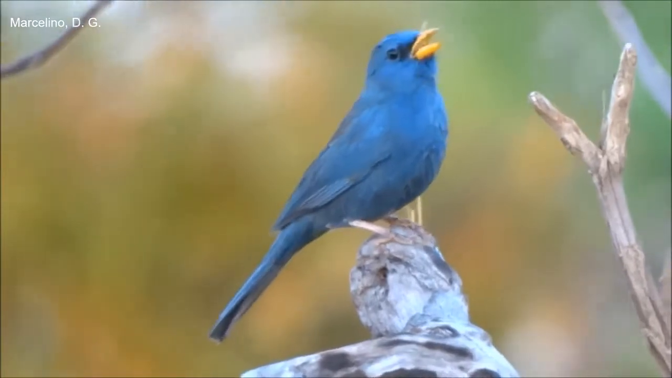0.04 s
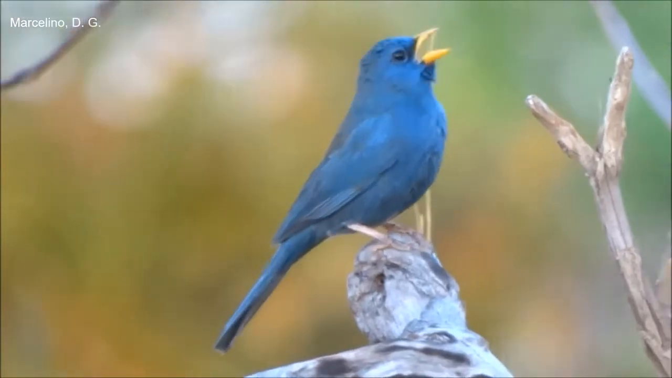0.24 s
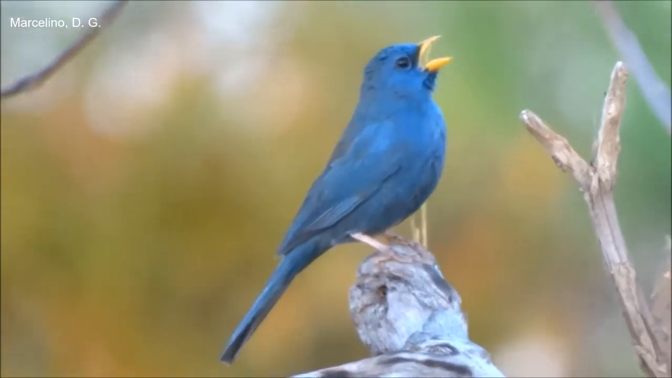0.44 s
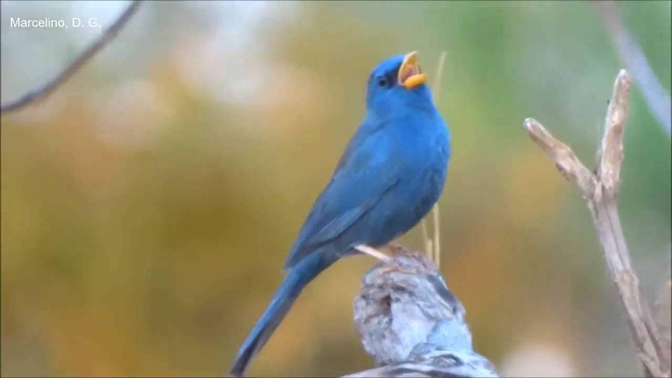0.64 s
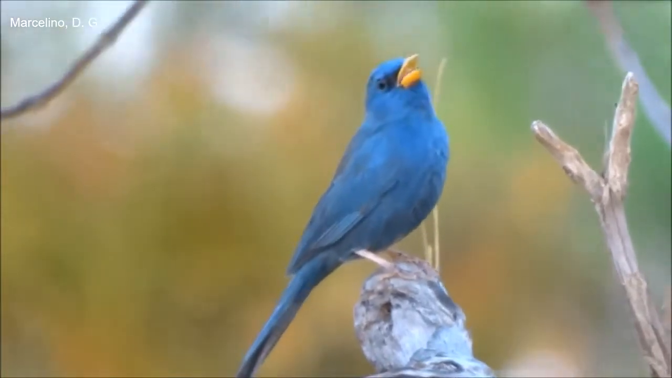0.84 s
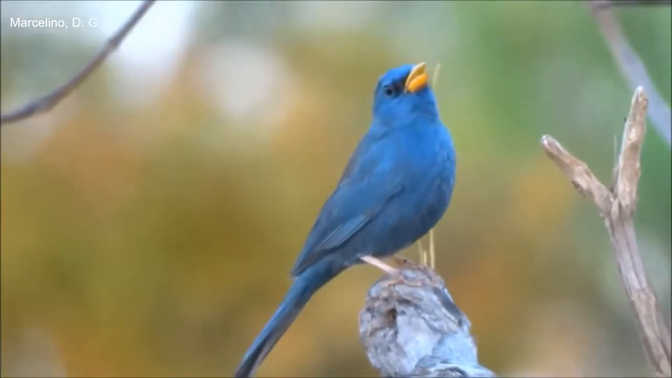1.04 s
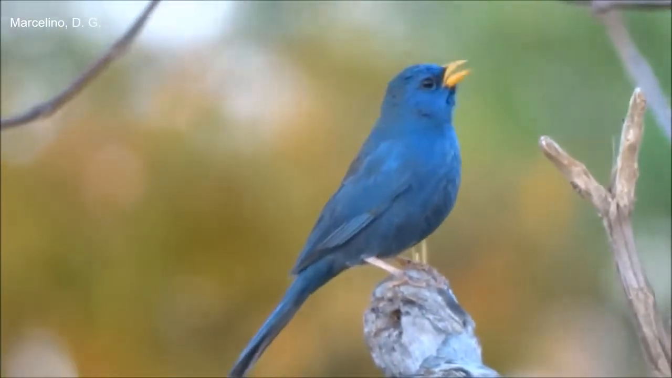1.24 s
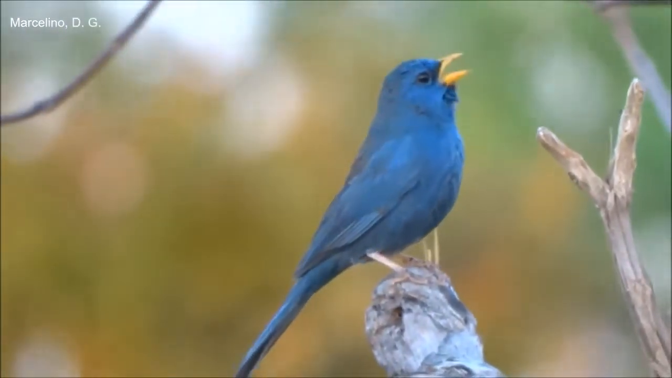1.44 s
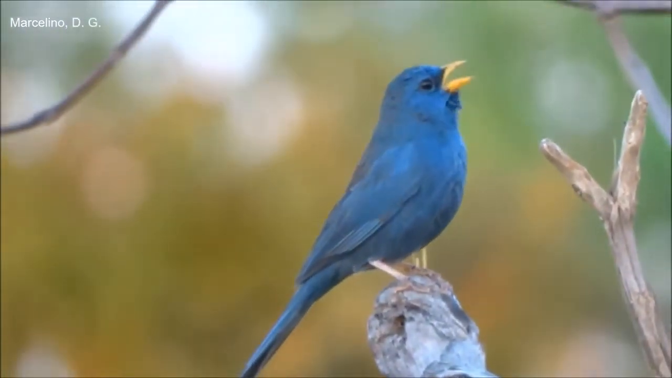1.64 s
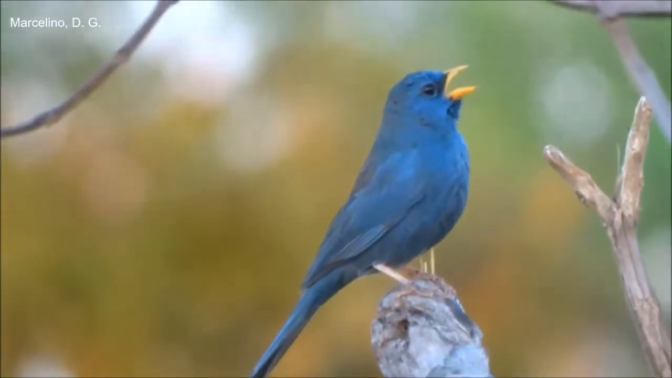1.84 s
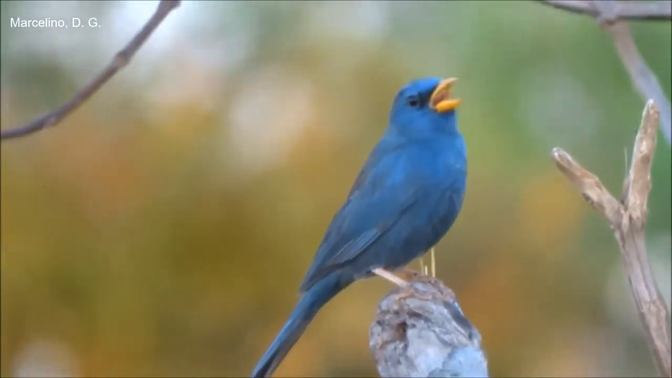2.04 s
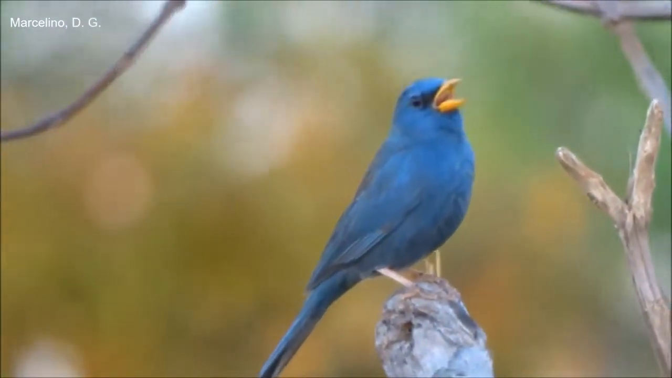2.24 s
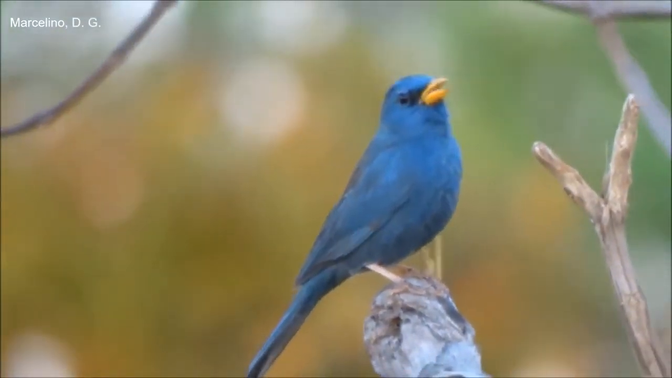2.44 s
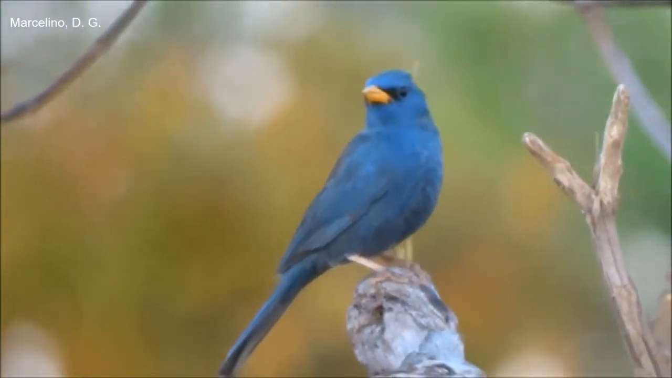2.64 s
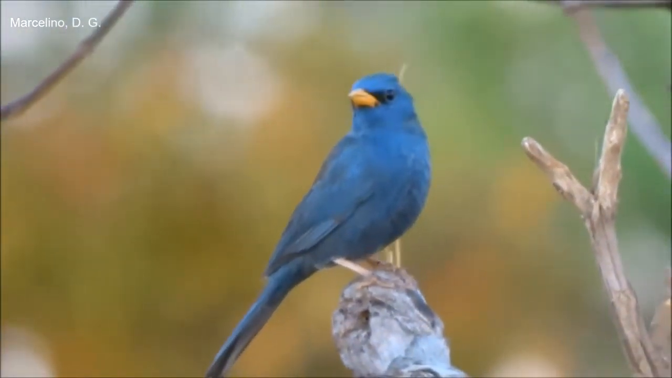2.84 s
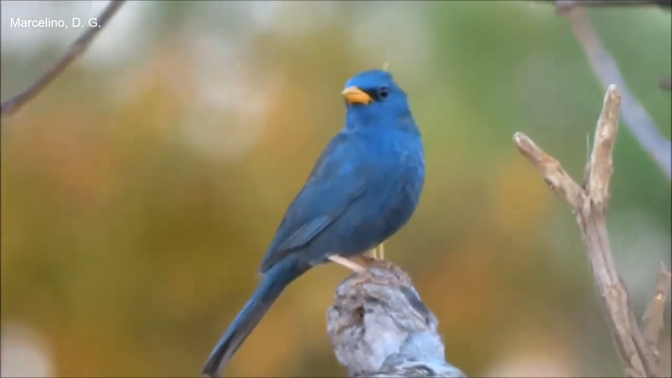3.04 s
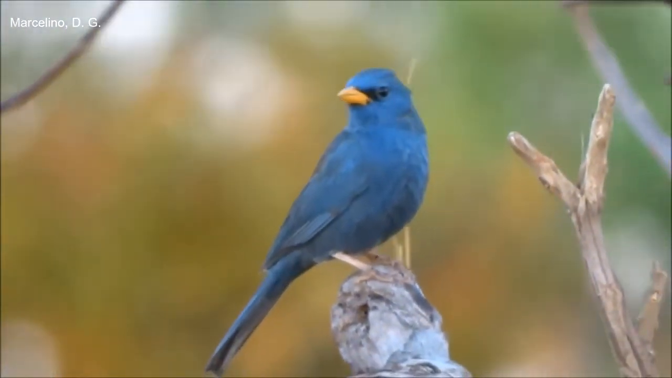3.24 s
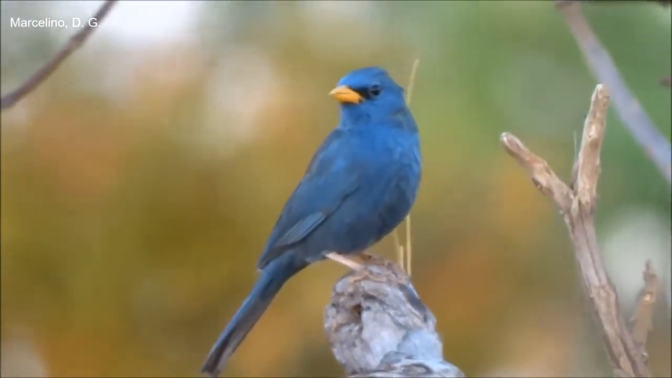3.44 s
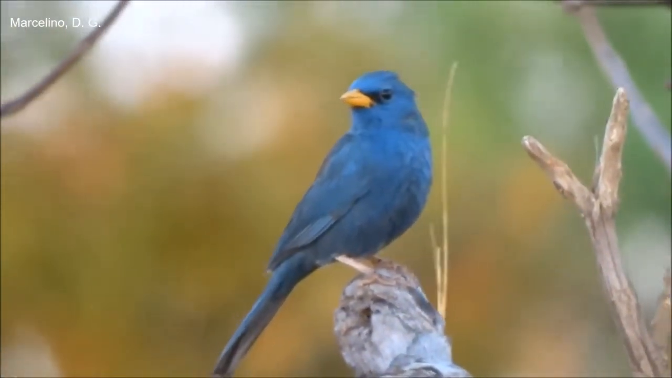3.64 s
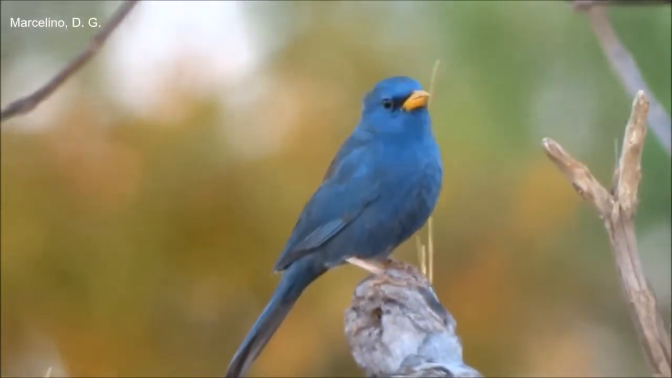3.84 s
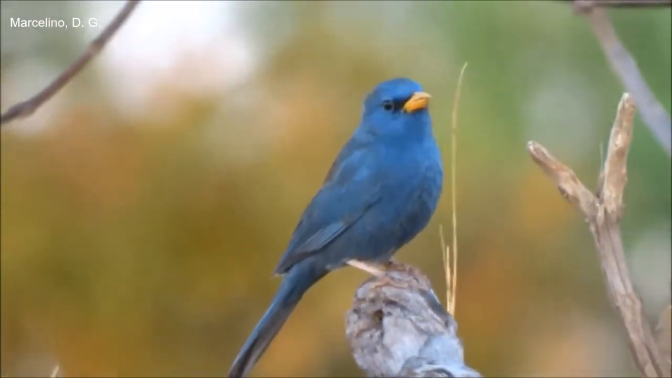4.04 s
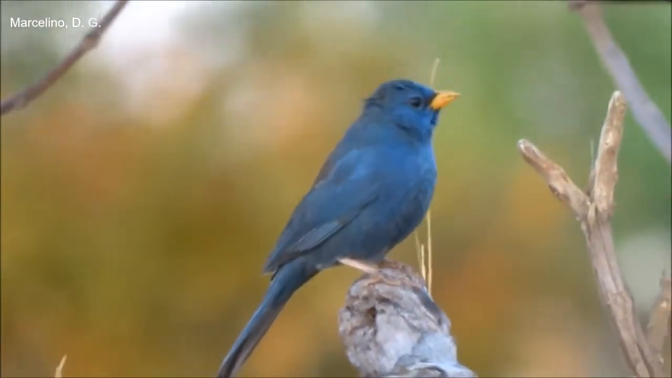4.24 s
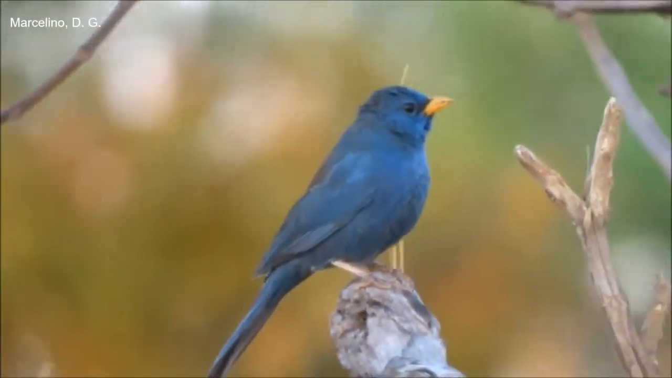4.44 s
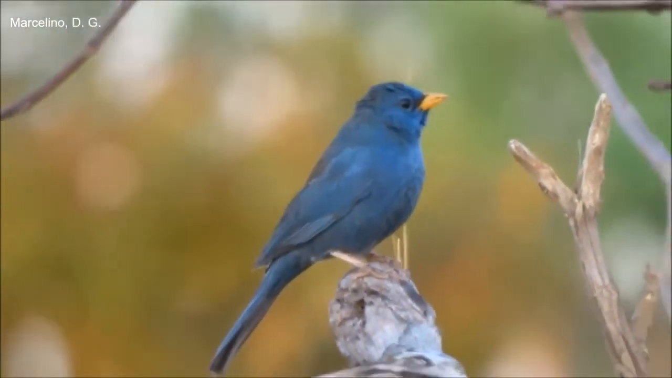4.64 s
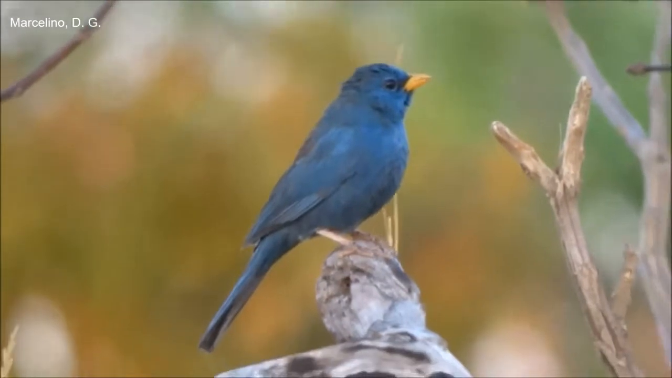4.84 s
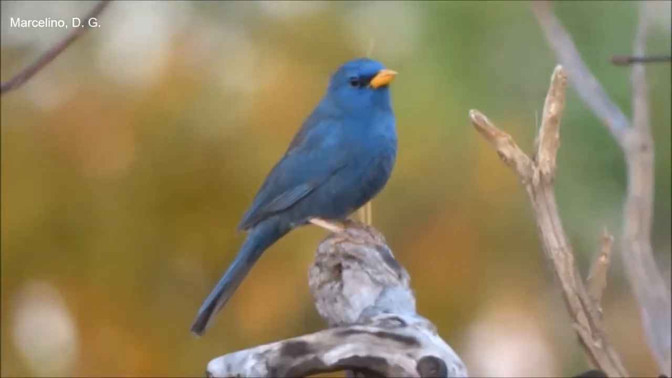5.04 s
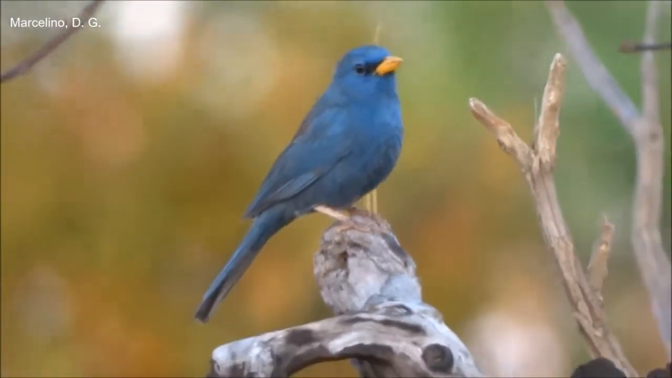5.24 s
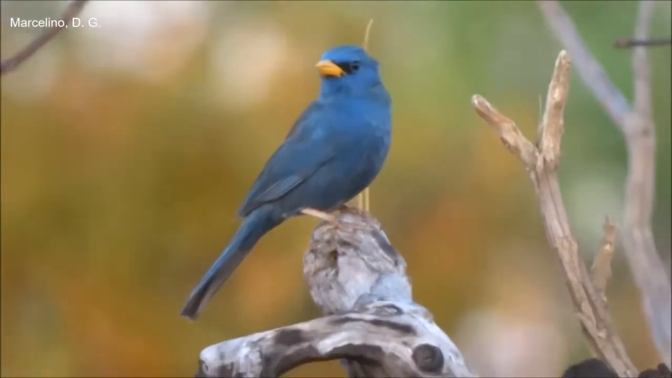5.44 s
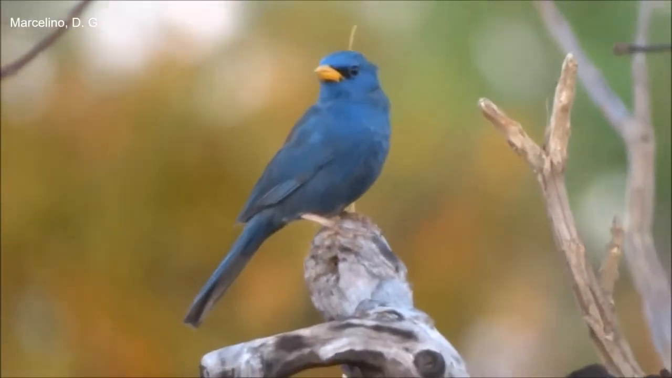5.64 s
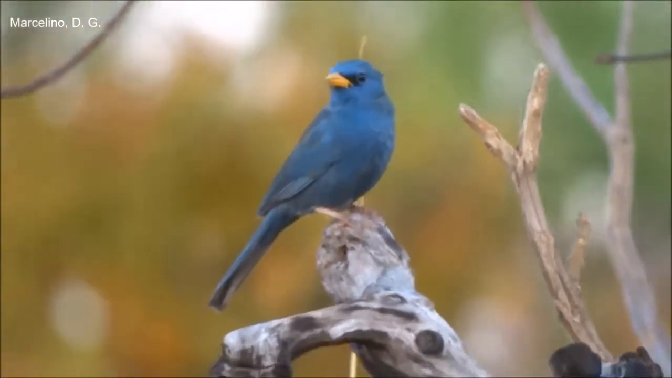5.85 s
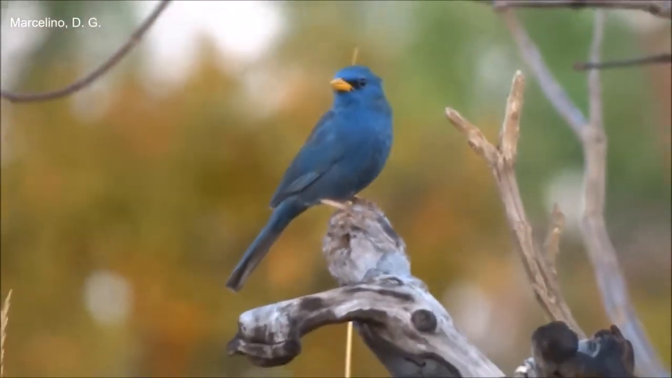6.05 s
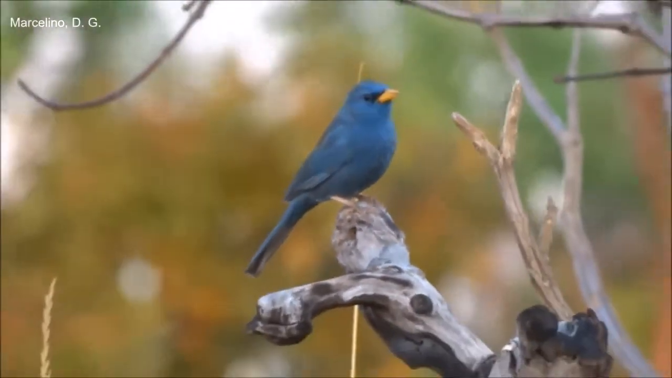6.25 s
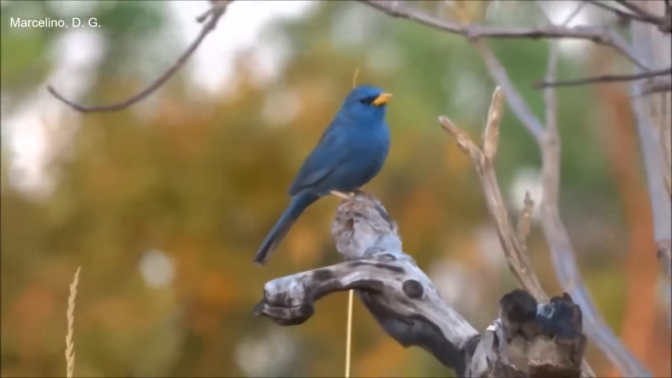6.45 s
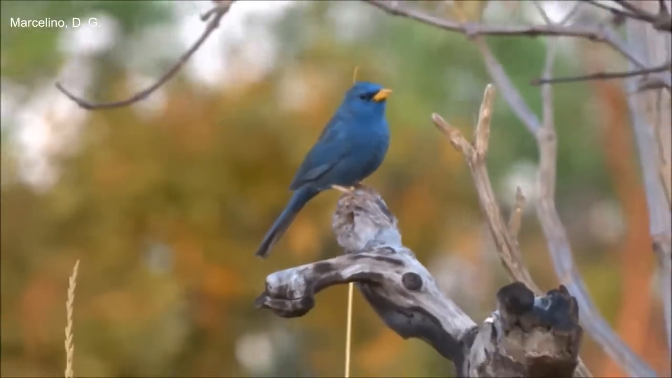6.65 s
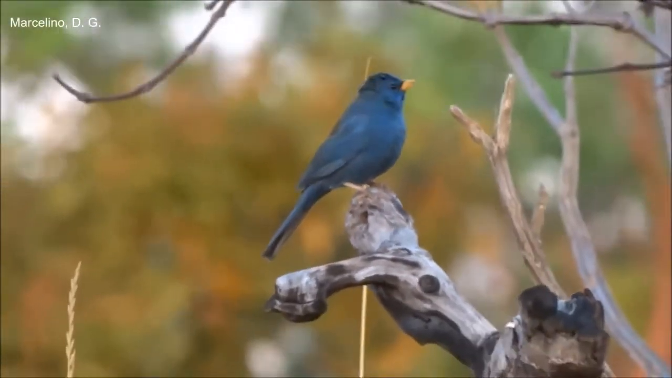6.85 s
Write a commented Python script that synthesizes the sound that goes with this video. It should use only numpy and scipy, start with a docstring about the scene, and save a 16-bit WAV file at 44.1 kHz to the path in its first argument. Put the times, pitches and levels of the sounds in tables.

```python
"""A finch sings close to the microphone: the end of one whistle, then a whole phrase as a far bird answers with a run of chips.
Its second phrase breaks off and starts afresh: down-slur, dip, arch, long pure glide. Near reflections make each glide throb.
Later come a second far run and a slow draught on the microphone; twig ticks, gusts and soft knocks fall here and there.
Wind hisses in the foliage throughout, its leaf hiss weakest at the end. Birds are swept tones with echoes; wind, ticks
and gusts are coloured noise, and knocks are damped tones."""
import sys
import numpy as np
from scipy import signal
from scipy.fft import rfft, irfft
from scipy.io import wavfile
from scipy.ndimage import uniform_filter1d, minimum_filter1d

SR = 44100
rng = np.random.default_rng(int(sys.argv[2]) if len(sys.argv) > 2 else 0)


def put_to_file(sound):
    """Save the sound as 16-bit audio at rate SR, in the file named by the first command-line argument."""
    columns = np.atleast_2d(sound).T  # one column per channel
    safe = np.clip(columns, -1, 1)
    whole_steps = np.round(safe * 32767)
    wavfile.write(sys.argv[1], SR, whole_steps.astype(np.int16))


N = 304731
T = np.arange(N) / SR

# wind strength before its gains: (time [s], rush level [dB], leaf hiss level [dB])
WIND_STRENGTH = [(0.0, -21.5, -27.5), (0.8, -21.5, -27.5), (1.3, -23.0, -28), (1.9, -23, -29.5),
                 (2.4, -22.5, -29.5), (2.9, -23, -30.5), (3.5, -23.5, -30), (4.0, -21.5, -28.5),
                 (4.4, -21, -27), (4.7, -23, -30.5), (5.1, -22.5, -30), (5.7, -22.5, -29), (5.95, -24, -31),
                 (6.3, -24, -33), (6.65, -24.5, -33), (6.9, -23.5, -34)]
# spectrum of the rush from the trees: (frequency [Hz], level [dB])
RUSH_SPECTRUM = [(30, -54), (80, -31.5), (160, -15), (300, -11.5), (520, -2), (750, 0), (1020, 0.5),
                 (1250, -3), (1900, -2.5), (2800, -8.5), (3900, -8.5), (4800, -17), (8000, -47),
                 (14000, -70)]
# spectrum of the leaf hiss: (frequency [Hz], level [dB])
LEAF_SPECTRUM = [(2000, -27), (3800, -0.5), (5000, -3), (6100, 2), (7100, -3), (7900, -2), (8450, -13),
                 (9400, -11), (10500, -18.5), (11300, -25), (12000, -27), (13000, -47), (15500, -50)]
# stereo width of the wind: (frequency [Hz], side level against mid [dB])
WIND_WIDTH = [(100, -48), (300, -25), (520, -19.5), (900, -17.5), (1500, -15), (2600, -12), (7500, -16.5),
              (10000, -7)]
RUSH_GAIN_DB, LEAF_GAIN_DB = 1.02, 1.42

# spectrum of moving air at the microphone: (frequency [Hz], level [dB])
RUMBLE_SPECTRUM = [(20, -30), (55, -2), (130, 3), (300, -1.5), (500, -5), (850, -13), (1500, -27),
                   (8000, -80)]
# gusts on the microphone: (time [s], half length [s], level [dB])
GUST_TIMES = [(1.312, .04, -49), (1.364, 0.014, -33), (2.19, .025, -36), (2.25, 0.022, -36),
              (2.65, 0.06, -46), (3.377, 0.075, -46), (3.837, .14, -38.5), (4.672, .025, -37),
              (4.84, .08, -42), (5.29, 0.043, -48)]
# a light draught swells and dies away once over a very faint floor
CALM_DB, DRAUGHT_DB, DRAUGHT_PEAK_S, DRAUGHT_HALF_S = -81, -46, 4.3, 1.53

# soft knocks on the microphone's mount: (time [s], peak level [dB])
KNOCKS = [(2.162, -12), (2.18, -6.5), (3.668, -15)]
# resonances of the mount: (frequency [Hz], level [dB], time to fall 60 dB [s])
MOUNT_MODES = [(125, -13, .08), (200, -6, .07), (290, 0, .07), (385, -1, .055), (740, -4, .06)]

# twig ticks, before gain and colouring: (time [s], level [dB])
TWIG_TICKS = [(1.2474, -5), (1.6298, -11), (2.8275, -18), (5.125, -13), (6.368, -14), (6.7205, -14)]
# spectrum of a twig tick: (frequency [Hz], level [dB])
TWIG_SPECTRUM = [(800, -20), (3500, 3.5), (7500, -1), (9000, -15), (12000, -23), (15000, -42)]
# thin high clicks, before gain and colouring: (time [s], level [dB])
HIGH_CLICKS = [(1.3688, -32), (1.4666, -40), (1.6616, -40), (1.8911, -44), (2.9627, -35), (3.5099, -44),
               (3.6845, -41), (5.1218, -44)]
# spectrum of a thin click: (frequency [Hz], level [dB])
HIGH_CLICK_SPECTRUM = [(6000, -30), (11000, -4), (14000, 3), (16000, -5)]

# shape of one far chip: (time from its start [s], pitch over top pitch [ratio], level [dB])
CHIP_SHAPE = [(0, .9, -6), (.008, .955, -4), (.014, .995, -1), (.021, 1, 1.5), (.028, .985, -2),
              (.036, .945, -9)]
# the far bird's two runs of chips: (time [s], top pitch [Hz], level [dB])
CHIP_RUNS = [(0.397, 4870, -28), (.469, 4930, -28), (.55, 4880, -34), (.628, 4900, -33), (.708, 4880, -28),
             (.792, 4820, -26.5), (.876, 4760, -25.5), (3.712, 4820, -31), (3.789, 4890, -27),
             (3.867, 4850, -26), (3.944, 4840, -25), (4.024, 4770, -32)]
# a gentle rise before each run, steep slurs after the first:
# (time [s], length [s], start pitch [Hz], end pitch [Hz], level [dB])
FAR_SLIDES = [(.335, 0.062, 3920, 4110, -34), (0.968, .015, 5770, 4400, -31.5),
              (1.029, .017, 5620, 3940, -34), (3.651, .074, 3790, 3890, -30)]
FAR_WET_DB, FAR_T60_S = -12, .2

# a dip, an arch and a long glide down ending in soft steps: (time from whistle start [s], pitch [Hz])
PITCH_GESTURE = [(0, 6850), (.013, 5880), (.038, 5300), (.056, 5930), (.09, 6600), (.135, 7000),
                 (.17, 7550), (.21, 7960), (.248, 8370), (.275, 8390), (.3, 8240), (.335, 8060),
                 (.358, 7900), (.383, 7530), (.408, 7110), (.434, 6850), (.457, 6400), (.487, 6140),
                 (.526, 5780), (.565, 5450), (.614, 5080), (.65, 4740), (.672, 4660), (.71, 4410),
                 (.742, 4180), (.79, 3880), (.83, 3850), (.89, 3550)]
# effort, easing at the top of the arch and faltering on the way down: (time from whistle start [s], level [dB])
EFFORT_GESTURE = [(0, -26), (.02, -18.5), (.038, -20.5), (.056, -16.5), (.09, -19.5), (.125, -13.5),
                  (.2, -16.5), (.23, -23), (.32, -17.5), (.36, -13.5), (.425, -5.5), (.53, -10.5),
                  (.568, -13), (.579, -22), (.592, -14), (.603, -13.5), (.638, -15.5), (.652, -13.5),
                  (.685, -19.5), (.705, -15), (.72, -18.5), (.75, -20), (.775, -20.5), (.815, -19),
                  (.845, -25), (.865, -26.5), (.89, -32)]
# each whistle, in full or broken off: (time [s], length [s], time stretch [ratio], level [dB],
# brief accent [dB], late fade [dB per s], lowest pitch [Hz])
SUNG_WHISTLES = [(-.125, 0.15, 1.08, -7.5, 0, 0, 3600), (0.198, 0.895, 1.008, .5, 7, 4, 3600),
                 (1.435, 0.159, 1.17, -2.5, 9, 2, 3600), (1.732, .85, 1.069, -1.2, 13, 14, 4090)]
# a down-slur in two uneven pushes before a whistle: (time from whistle start [s], pitch [Hz], level [dB])
LEAD_IN_SLUR = [(-.047, 6350, -34), (-.039, 6080, -24), (-.031, 5720, -19), (-.021, 5400, -30),
                (-.012, 4980, -20), (-.004, 4750, -30)]
# the level jumps just after the dip turns upward (times before stretching)
ACCENT_AT_S, ACCENT_HALF_S = 0.0485, 0.0015
FADE_FROM_S = 0.39  # from the whistle's start, not stretched
# a near surface, its weaker second bounce at twice the delay, and a faint later echo: (delay [s], level [dB])
NEAR_REFLECTIONS = [(.002775, -5), (.00555, -19), (.032, -28)]
SCATTER_DB, SCATTER_T60_S = -14.5, .085  # twigs around the bird
THICKET_DELAY_S, THICKET_DB, THICKET_T60_S = .033, -24, .18  # a ragged echo from a few metres off
WOODS_DB, WOODS_T60_S = -38, .5

# unsteadiness of each voice: share of pitch, and level in dB
FINCH_WOBBLE, FINCH_WOBBLE_DB, FAR_WOBBLE, FAR_WOBBLE_DB = .0026, .7, .004, 1.2
# new random values per second, and the tremor's strength against the slower wobble
WOBBLE_PER_S, TREMOR_PER_S, TREMOR_SHARE = 70, 450, 1.1

TOP_HZ = 15800  # upper limit of the sound


def undb(db):
    """Decibels to amplitude gain."""
    return 10 ** (np.asarray(db) / 20)


def curves(table, t=T):
    """Columns of a table joined by straight lines in time."""
    s, *columns = np.transpose(table)
    return [np.interp(t, s, column) for column in columns]


def colour(x, points):
    """Filter by a spectrum whose points are joined along log frequency."""
    point_hz, point_db = np.transpose(points)
    hz = np.maximum(np.arange(N // 2 + 1) * SR / N, 1)
    gain = undb(np.interp(np.log(hz), np.log(point_hz), point_db))
    return irfft(rfft(x) * gain, N)


def noise(points):
    """Coloured noise of rms 1."""
    x = colour(rng.standard_normal(N), points)
    return x / np.std(x)


def walk(rate):
    """Random values, `rate` of them a second, smoothed twice so that they drift."""
    hold = max(int(SR / rate), 1)
    steps = np.repeat(rng.standard_normal(N // hold + 1), hold)
    smooth = uniform_filter1d(uniform_filter1d(steps, hold), hold)
    return 1.3 * smooth[:N]  # makes up for the spread lost in smoothing


def add(out, s, x):
    """Mix a sound in at time s."""
    i = max(int(s * SR), 0)
    out[i:i + len(x)] += x[:max(N - i, 0)]


def late(x, s):
    """Delay a sound by s seconds, by turning the phase of its spectrum."""
    hz = np.arange(N // 2 + 1) * SR / N
    return irfft(rfft(x) * np.exp(-2j * np.pi * hz * s), N)


def tail(x, t60):
    """Dense echoes as decaying noise, different for each channel."""
    t = np.arange(int(t60 * SR)) / SR
    echoes = rng.standard_normal((2, len(t))) * undb(-60 * t / t60)
    echoes /= np.sqrt(np.sum(echoes ** 2, axis=1, keepdims=True))
    return signal.fftconvolve(x[None], echoes, axes=1)[:, :N]


def wide(points, flicker_db):
    """Flickering stereo noise, nearly the same in both channels."""
    side = colour(noise(points), WIND_WIDTH)
    stereo = noise(points) + side * np.array([[1], [-1]])
    return stereo * undb(flicker_db * walk(12))


def wind():
    """Turbulent air as noise: a broad rush from the trees with brighter leaf hiss on top."""
    rush_db, hiss_db = curves(WIND_STRENGTH)
    rush = undb(RUSH_GAIN_DB + rush_db) * wide(RUSH_SPECTRUM, flicker_db=0.56)
    hiss = undb(LEAF_GAIN_DB + hiss_db) * wide(LEAF_SPECTRUM, flicker_db=0.77)
    return rush + hiss


def swell(s, half_s, db):
    """A bell-shaped rise and fall around time s."""
    return undb(db) * np.exp(-((T - s) / half_s) ** 2)


def ports(points, shared):
    """Air noise at the two microphone ports: partly common, partly each its own."""
    own = np.array([noise(points), noise(points)])
    return (own + shared * noise(points)) / np.sqrt(1 + shared ** 2)


def buffets(flicker_db=1.5):
    """Air rumbles on the ports: a draught mostly on each alone, gusts mostly on both together."""
    draught_level = undb(CALM_DB) + swell(DRAUGHT_PEAK_S, DRAUGHT_HALF_S, DRAUGHT_DB)
    draught = draught_level * ports(RUMBLE_SPECTRUM, shared=0.62)
    gusts = sum(swell(*gust) for gust in GUST_TIMES) * ports(RUMBLE_SPECTRUM, shared=1.7)
    return (draught + gusts) * undb(flicker_db * walk(30))


def bumps(contact_s=0.00294, port_lag_s=0.001):
    """Soft knocks ring the mount's damped modes and reach one port later than the other."""
    out, t = np.zeros(N), np.arange(SR // 5) / SR
    ring = sum(undb(db - 60 * t / t60) * np.sin(2 * np.pi * hz * t) for hz, db, t60 in MOUNT_MODES)
    ring *= 1 - np.exp(-t / contact_s)  # a soft contact rounds the onset
    for s, db in KNOCKS:
        add(out, s, undb(db) * ring / np.abs(ring).max())
    return np.array([out, late(out, port_lag_s)])


def ticks(table, sound, t60, crack_db):
    """A very short, dry crack of decaying noise for each row."""
    out, t = np.zeros(N), np.arange(SR // 40) / SR
    for s, db in table:
        crack = rng.standard_normal(len(t)) * np.exp(-np.log(1000) * t / t60)
        add(out, s, undb(db + crack_db) * crack / np.abs(crack).max())
    return colour(out, sound)


def sing(notes, wobble, wobble_db, edge_s=0.0015):
    """The syrinx: one pure tone a note; pitch and air pressure wobble, with a finer tremor on top."""
    out = np.zeros(N)
    drift, pressure = (walk(WOBBLE_PER_S) + TREMOR_SHARE * walk(TREMOR_PER_S) for _ in range(2))
    for note in notes:
        i = np.arange(max(int(note[0][0] * SR), 0), int(note[-1][0] * SR))
        hz, db = curves(note, i / SR)
        hz = uniform_filter1d(hz, size=260, mode="nearest") * (1 + wobble * drift[i])
        from_edge = np.minimum(i - i[0], i[-1] - i) / (edge_s * SR)
        gate = np.sin(np.pi / 2 * np.clip(from_edge, 0, 1))
        tone = np.sqrt(2) * np.sin(2 * np.pi * np.cumsum(hz) / SR)
        out[i] += gate * undb(db + wobble_db * pressure[i]) * tone
    return out


def glide(s, length, start_hz, end_hz, db):
    """A note that slides straight from one pitch to another."""
    return [(s, start_hz, db), (s + length, end_hz, db)]


def far_bird():
    """Whistled slides and runs of arched chips, blurred by echoes from the trees."""
    notes = [glide(*row) for row in FAR_SLIDES]
    for s, hz, db in CHIP_RUNS:
        notes.append([(s + dt, hz * ratio, db + shape_db) for dt, ratio, shape_db in CHIP_SHAPE])
    song = sing(notes, FAR_WOBBLE, FAR_WOBBLE_DB)
    return song + undb(FAR_WET_DB) * tail(song, FAR_T60_S)


def finch_notes():
    """Each whistle follows one gesture at its own pace after a down-slur; notes ending before time 0 are dropped."""
    notes = []
    for s, length, stretch, db, accent, fade, lowest_hz in SUNG_WHISTLES:
        t = np.linspace(0, length, 900)
        gesture_s = t / stretch
        hz, = curves(PITCH_GESTURE, gesture_s)
        effort_db, = curves(EFFORT_GESTURE, gesture_s)
        accent_db = accent * np.exp(-((gesture_s - ACCENT_AT_S) / ACCENT_HALF_S) ** 2)
        fade_db = fade * np.maximum(t - FADE_FROM_S, 0)
        level_db = db + effort_db + accent_db - fade_db
        notes.append(np.array(LEAD_IN_SLUR) + [s, 0, 0])
        notes.append(np.column_stack([s + t, np.maximum(hz, lowest_hz), level_db]))
    return [note for note in notes if note[-1, 0] > 0]


def finch(spread=0.24):
    """The song and its reflections add and cancel in turn as the pitch glides, so the whistle throbs."""
    song = sing(finch_notes(), FINCH_WOBBLE, FINCH_WOBBLE_DB)
    echoes = sum(undb(db) * late(song, delay) for delay, db in NEAR_REFLECTIONS)
    # late scatter still carries the earlier pitch and beats roughly against the glide
    scatter = undb(SCATTER_DB) * tail(song, SCATTER_T60_S)
    thicket = undb(THICKET_DB) * tail(late(song, THICKET_DELAY_S), THICKET_T60_S)
    mid, side = scatter + thicket
    twigs = mid + spread * side * np.array([[1], [-1]])
    woods = undb(WOODS_DB) * tail(song, WOODS_T60_S)
    return song + echoes + twigs + woods


def scene():
    """Both birds in the wind, with the small noises around the microphone."""
    twigs = ticks(TWIG_TICKS, TWIG_SPECTRUM, t60=0.0089, crack_db=4)
    thin = ticks(HIGH_CLICKS, HIGH_CLICK_SPECTRUM, t60=0.008, crack_db=10)
    return wind() + buffets() + bumps() + twigs + thin + far_bird() + finch()


def record(dry, ceiling=0.93):
    """A fast limiter holds down the loudest peaks, and a steep low-pass cuts the top."""
    allowed = np.minimum(1, ceiling / (np.abs(dry).max(axis=0) + 1e-9))
    gain = uniform_filter1d(minimum_filter1d(allowed, size=61), size=61)
    low_pass = signal.ellip(8, .2, 70, TOP_HZ, fs=SR, output="sos")
    return signal.sosfilt(low_pass, dry * gain)


dry = scene()
out = record(dry)
put_to_file(out)
```